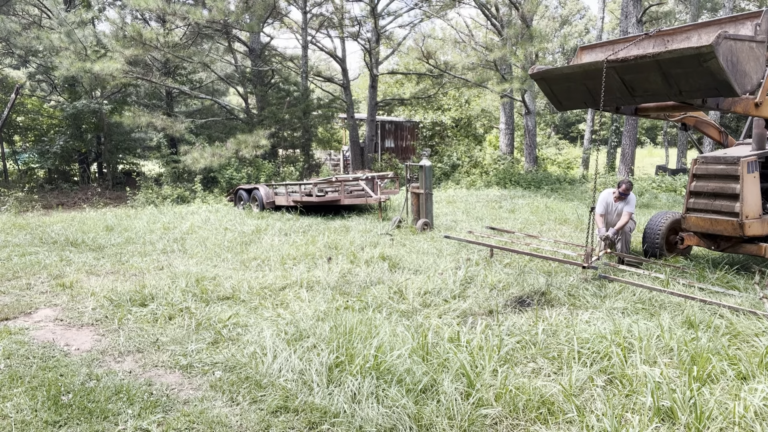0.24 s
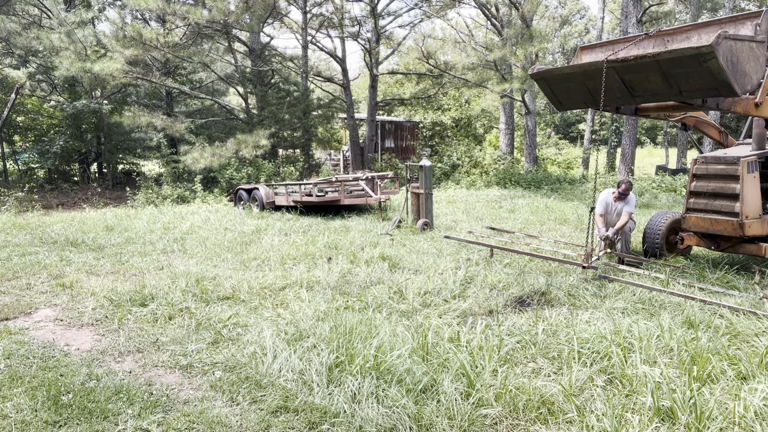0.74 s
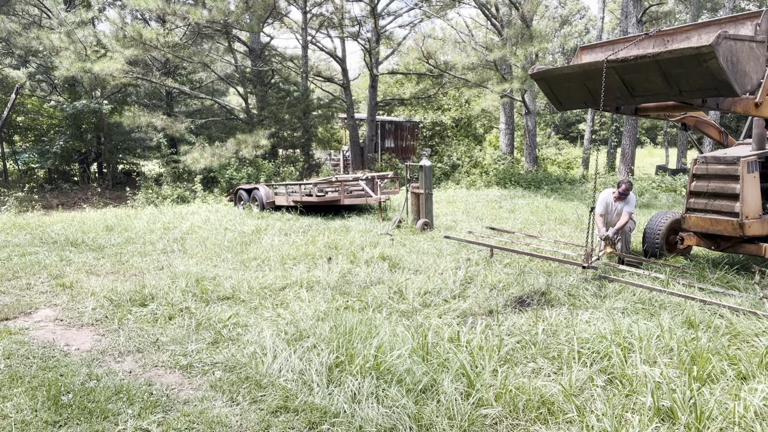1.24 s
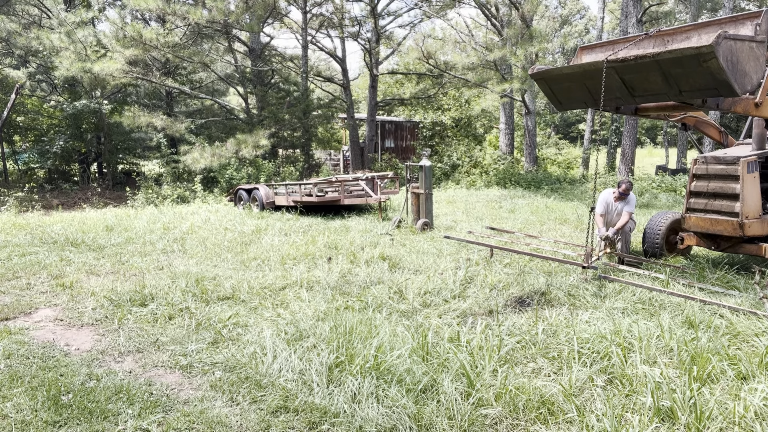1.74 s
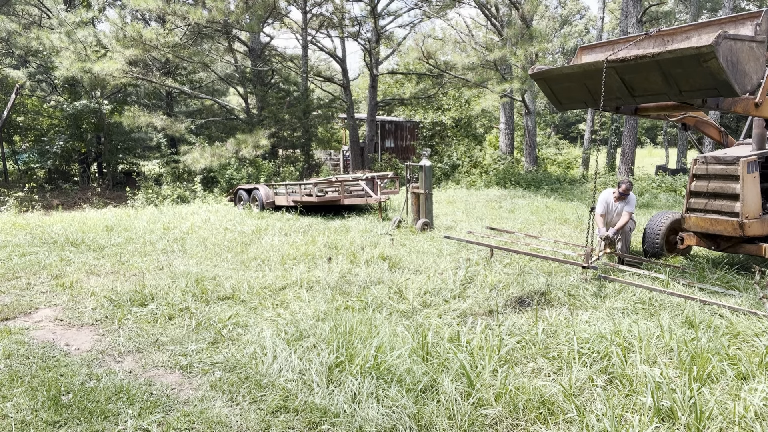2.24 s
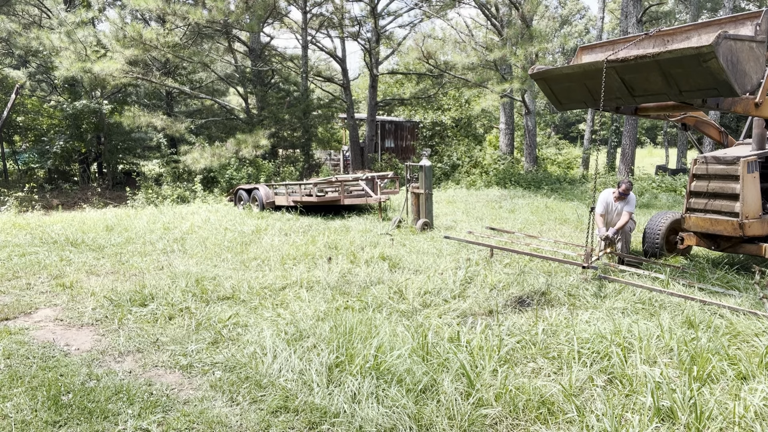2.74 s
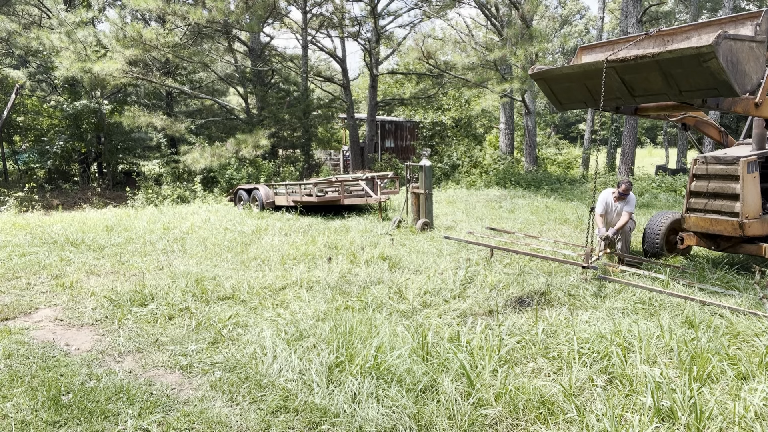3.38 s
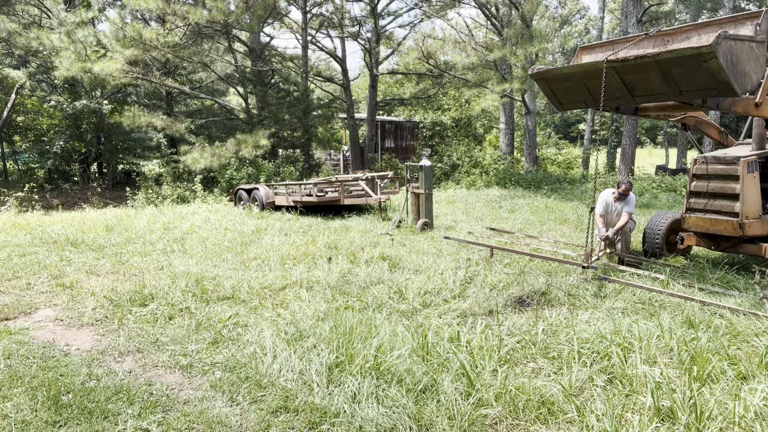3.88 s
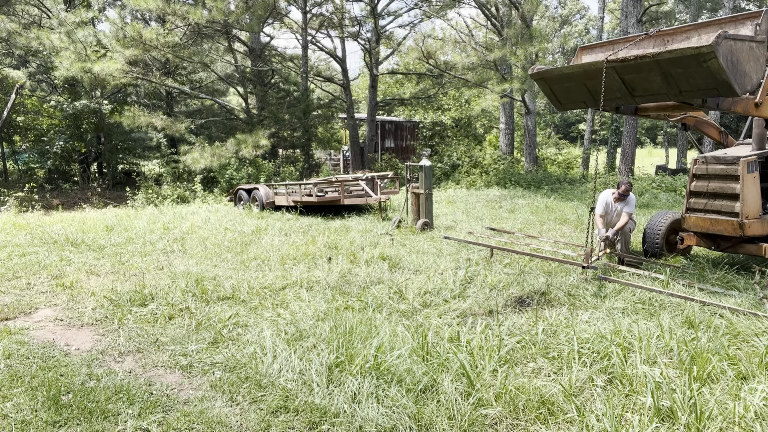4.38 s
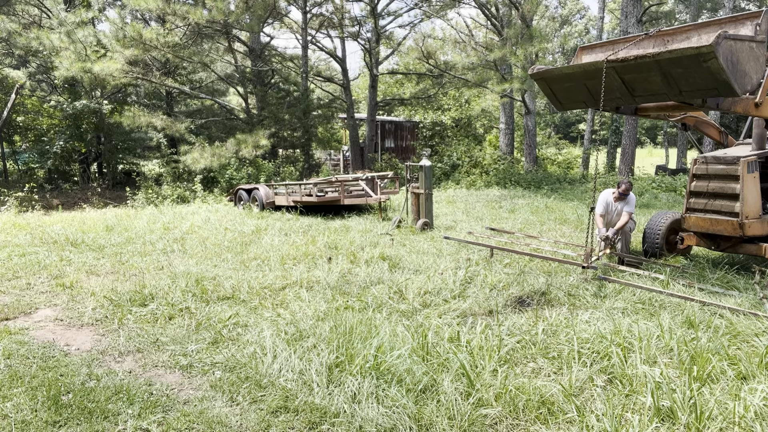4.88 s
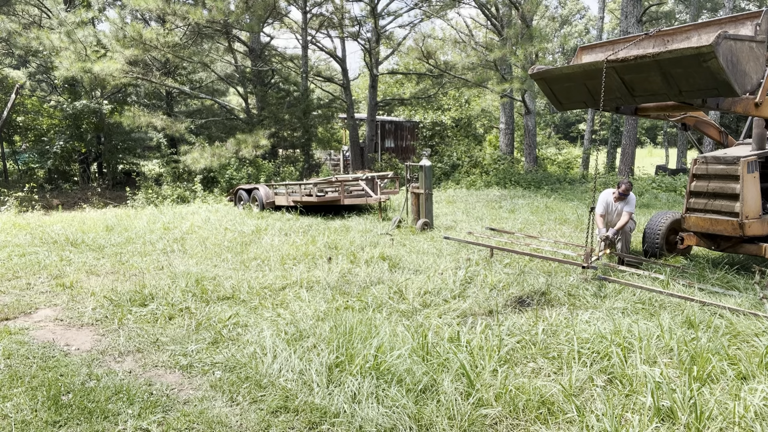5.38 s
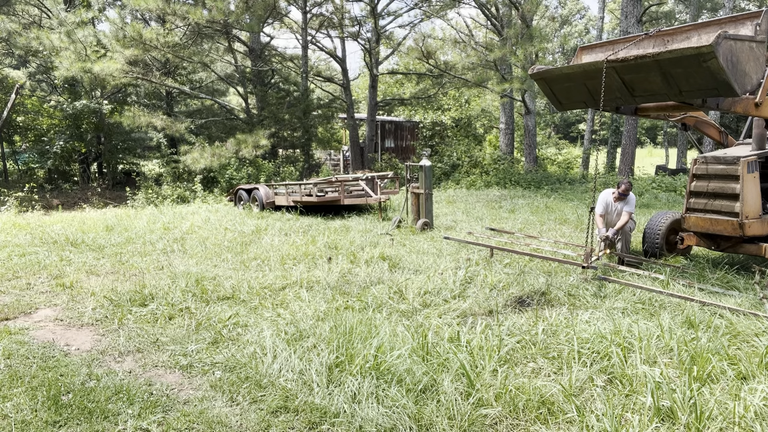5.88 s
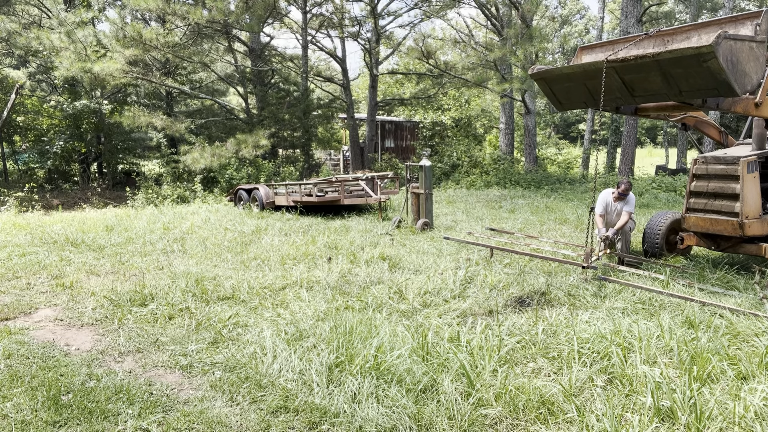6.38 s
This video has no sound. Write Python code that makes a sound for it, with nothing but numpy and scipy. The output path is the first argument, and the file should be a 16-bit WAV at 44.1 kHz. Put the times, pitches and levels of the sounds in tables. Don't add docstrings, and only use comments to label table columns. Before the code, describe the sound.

From 0 s, an outdoor yard rumbles softly and a far engine idles with a low, wavering hum around 100 Hz, a fainter octave coming and going above it. A gas torch jet hisses quietly, lifting slightly near 0.5 s. At about 1 s the cut catches with a brief soft puff, and by 1.4 s it has swelled into a broad, bright, rushing roar. From 1.5 to 2.6 s it flutters with quick surges and dips, eases near 2.9 s, then strengthens around 3.3 s. It swells again at 3.9 s, turns duller near 4.45 s and pushes up at 4.75 s. The roar holds fairly steady until it almost chokes at 5.9 s, returning weaker and continuing to the end at about 6.6 s. Nearby metal gives it fine, shifting resonances. Distant stereo microphones, open air, little echo.

```python
import sys
import numpy as np
from scipy import signal
from scipy.fft import rfft, irfft
from scipy.io import wavfile
from scipy.ndimage import uniform_filter1d

SR = 44100
rng = np.random.default_rng(int(sys.argv[2]) if len(sys.argv) > 2 else 0)


def convert_level_to_amplitude(level_db):
    exponent = np.asarray(level_db, float) / 20
    return 10 ** exponent


def file_out(sig):
    cols = np.atleast_2d(sig).T
    lim = np.clip(cols, -1, 1)
    pcm = np.round(lim * 32767).astype(np.int16)
    wavfile.write(sys.argv[1], SR, pcm)


N = 291942


def evened(x):
    return x / np.sqrt(np.mean(x ** 2) + 1e-20)


def read_spectrum(points, hz):
    f, value = np.transpose(points)
    return np.interp(np.log(hz + 1), np.log(f + 1), value)


def blotches(shape, bins, frames):
    field = rng.standard_normal(shape)
    for _ in range(2):
        field = uniform_filter1d(field, bins, 0)
        field = uniform_filter1d(field, frames, 1)
    return evened(field)


def slow_noise(smooth):
    once = uniform_filter1d(rng.standard_normal(N), smooth)
    return evened(uniform_filter1d(once, smooth))


def frame_grid(size):
    hop = size // 4
    return np.fft.rfftfreq(size, 1 / SR), np.arange(N // hop + 5) * hop / SR


def shaped_noise(level_db, size):
    shape = level_db.shape
    z = convert_level_to_amplitude(level_db) * (rng.standard_normal(shape) + 1j * rng.standard_normal(shape))
    return signal.istft(z, nperseg=size, noverlap=size * 3 // 4)[1][:N]


def noise_pair(level_db, size):
    return np.array([shaped_noise(level_db, size), shaped_noise(level_db, size)])


def rumble():
    # freq_hz [Hz], level_db [dB per Hz]
    yard_spectrum = [(21, -44), (35, -5.5), (112, -7), (210, -13.5), (376, -16), (632, -22.5), (825, -28),
                     (997, -26), (1500, -19.5), (1950, -15), (3300, -120)]
    hz, t = frame_grid(size=4096)
    swell_db = 0.94 * blotches((len(hz), len(t)), bins=8, frames=12)
    level_db = read_spectrum(yard_spectrum, hz)[:, None] + swell_db
    return convert_level_to_amplitude(-47) * evened(noise_pair(level_db, size=4096))


def resonate(x, hz, width_hz):
    turn = np.exp(2j * np.pi * np.cumsum(hz) / SR)
    r = np.exp(-np.pi * width_hz / SR)
    return 2 * (turn * signal.lfilter([1 - r], [1, -r], x / turn)).real


def octave_gain(t):
    # start_s [s], length_s [s], level_db [dB]
    octave_spells = [
        (0.066, .62, -51),
        (0.77, 0.14, -51),
        (0.998, 0.78, -50.5),
        (1.81, 0.78, -53.5),
        (3.427, 0.42, -51.5),
        (3.954, 0.76, -56),
        (4.894, 0.46, -52.5),
        (5.4, 1.2, -61.5),
    ]
    edge_s, rest_db = 0.099, -71.5
    gain = convert_level_to_amplitude(rest_db)
    for start, length, db in octave_spells:
        inside_s = np.minimum(t - start, start + length - t)
        gain = gain + convert_level_to_amplitude(db) * np.clip(inside_s / edge_s + .5, 0, 1)
    return gain


def engine():
    # time_s [s], pitch_hz [Hz] of firing, level_db [dB] of firing tone
    idle = [(0.0, 101, -45), (0.4, 102, -48), (0.7, 103, -47), (0.79, 103, -37), (1.1, 103.2, -45),
            (1.78, 104.2, -44), (1.9, 104.6, -52.5), (2.65, 104.2, -42.5), (3.1, 104.1, -42),
            (3.42, 103, -51.5), (3.7, 103, -44), (4.02, 103.6, -61), (4.2, 104.4, -46),
            (5.14, 104.2, -44.5), (5.5, 104, -47.5), (5.78, 105.8, -41), (6.42, 105.8, -43),
            (6.62, 105.5, -48)]
    # multiple [of firing pitch], width_hz [Hz], level_db [dB], fade_share [of the common fade]
    shaft_orders = [(.51, 3.9, -60, 0), (1.282, 1.5, -50, .7), (1.531, 0.74, -47.5, 4.5),
                    (2.3, 1.7, -66, 1), (2.929, 9, -63, 0), (4.05, 9, -67, 0)]
    fade_db_per_s = -3
    t = np.arange(N) / SR
    time_s, pitch_hz, level_db = np.transpose(idle)
    hz, tone_db = np.interp(t, time_s, pitch_hz), np.interp(t, time_s, level_db)
    turns = 2 * np.pi * np.cumsum(uniform_filter1d(hz, 6000)) / SR
    firing = convert_level_to_amplitude(tone_db + 1.75 * slow_noise(2500)) * np.sin(turns)
    octave = convert_level_to_amplitude(1.2 * slow_noise(2500)) * octave_gain(t) * np.sin(2 * turns + 1)
    hum = np.sqrt(2) * (firing + octave)
    for multiple, width, db, fade_share in shaft_orders:
        narrow = resonate(rng.standard_normal(N), multiple * hz, width)
        order = evened(resonate(narrow, multiple * hz, 2 * width))
        hum = hum + convert_level_to_amplitude(db + fade_db_per_s * fade_share * t) * order
    return np.array([hum, 0 * hum])


def surges_db(t):
    # time_s [s], change_db [dB], length_s [s]
    slag_surges = [(0.74, 3, 0.027), (0.955, 0, 0.04), (1.294, -3.5, 0.077), (1.548, 2, 0.04),
                   (1.707, 4, 0.049), (1.776, -2.5, 0.049), (2.045, 3.5, 0.028), (2.256, 4, 0.03),
                   (2.292, -4, 0.037), (2.36, -3.5, 0.057), (2.437, 5.5, 0.036), (2.62, 2, 0.026),
                   (2.963, 2.3, 0.017), (3.074, 0.3, 0.045), (3.36, -1.5, 0.091), (3.48, -3, 0.08),
                   (3.598, 2, 0.06), (3.907, 4.9, 0.12), (4.103, -2, 0.031), (4.25, -1.5, 0.089),
                   (4.762, 4, 0.12), (4.845, -3, 0.032), (5.425, -1.3, 0.14), (6.344, 1, 0.19)]
    catch_s, catch_db, catch_decay_s = 1.0, 2, 0.035
    total_db = catch_db * (t >= catch_s) * np.exp(-abs(t - catch_s) / catch_decay_s)
    for at, db, length in slag_surges:
        total_db = total_db + db * np.exp(-4 * np.log(2) * ((t - at) / length) ** 2)
    return total_db


def jet_field():
    # time_s [s], roar_db [dB] for depth of cut, aim_db [dB] for nozzle toward camera
    torch_moves = [(0.0, -47.5, -1), (0.55, -43.9, 1.8), (0.88, -47.5, 3), (1.02, -43, 0.8),
                   (1.36, -31, 1.5), (1.75, -34, -0.1), (2.3, -34.5, -0.8), (2.85, -37.5, -1.5),
                   (3.3, -33, 1.5), (3.8, -36.5, -1.3), (4.15, -35.5, -0.5), (4.45, -37.5, -5.5),
                   (4.68, -36, -0.9), (5.4, -36, 1.2), (5.86, -39, 1.2), (5.94, -45.5, -3),
                   (6.1, -41, -1.5), (6.62, -39, -2)]
    # freq_hz [Hz], layer [index: boom, body, roar, hiss, fizz]
    jet_bands = [(800, 0), (1500, 1), (1900, 1), (3200, 2), (5600, 2), (6800, 3), (11100, 3), (11800, 4)]
    follow_cut = [0.54, 0.74, 0.99, 0.79, .57]
    follow_aim = [-0.39, -0.51, 0.073, 0.93, 1.3]
    follow_surge = [.4, .8, 1, 1.05, 1.1]
    mean_roar_db = -37.3
    hz, t = frame_grid(size=1024)
    time_s, roar_db, aim_db = np.transpose(torch_moves)
    layers_db = mean_roar_db + np.outer(follow_cut, np.interp(t, time_s, roar_db) - mean_roar_db)
    layers_db = layers_db + np.outer(follow_aim, np.interp(t, time_s, aim_db))
    layers_db = layers_db + np.outer(follow_surge, surges_db(t))
    band_hz, layer = np.transpose(jet_bands)
    share = np.array([np.interp(hz, band_hz, layer == k) for k in range(len(layers_db))]).T
    shape = (len(hz), len(t))
    drifting_db = .75 * blotches(shape, bins=8, frames=40)
    patchy_db = 0.87 * blotches(shape, bins=30, frames=6)
    flicker_db = 0.71 * blotches(shape, bins=300, frames=3)
    return share @ layers_db + drifting_db + patchy_db + flicker_db


def many_paths(x, comb_db):
    hz, t, z = signal.stft(x, SR, nperseg=4096)
    streaks_db = comb_db * blotches(z.shape[1:], bins=3, frames=12)
    mean_rise_db = comb_db ** 2 * np.log(10) / 20
    return signal.istft(z * convert_level_to_amplitude(streaks_db - mean_rise_db), SR, nperseg=4096)[1][:, :N]


def rings_db(hz):
    # freq_hz [Hz], width_hz [Hz], level_db [dB]
    resonances = [(1002, 46, 5.6), (1134, 44, 6.5), (1256, 99, 2.3), (1358, 53, 7.0), (1491, 39, 4.1),
                  (1699, 247, 5.7), (1836, 46, 6.5), (2078, 66, 4.3), (2289, 30, 0.2), (2571, 30, 2.7),
                  (2678, 30, 3.5), (2842, 98, 4.1), (3165, 50, 2.9), (3410, 89, 3.5), (3809, 141, 4.3),
                  (4029, 120, 7.3), (4270, 199, 4.2), (4664, 299, 4.8), (4996, 119, 3.7), (5223, 461, 6.1),
                  (5887, 75, 2.3), (6660, 157, 4.0), (7094, 262, 5.0), (8246, 299, 3.2), (8867, 564, 4.0),
                  (10213, 92, 2.0), (10477, 79, 3.2), (10980, 257, 2.1), (12647, 947, 2.5),
                  (14696, 718, 2.0)]
    return sum(db * np.exp(-.5 * (2 * (hz - f) / w) ** 2) for f, w, db in resonances)


def jet():
    # freq_hz [Hz], level_db [dB]
    jet_colour = [(250, -15.8), (600, -5.5), (900, -8.3), (1500, -4.6), (2500, -1.7), (3500, -1.5),
                  (5000, -3.9), (6100, -1.4), (7600, -0.1), (9000, 0.0), (11200, -0.8), (12000, -5.4),
                  (13600, -2.5), (15600, -2.2)]
    level_db = jet_field() - 17
    sputter = convert_level_to_amplitude(0.4 * slow_noise(90))
    hiss = many_paths(sputter * noise_pair(level_db, size=1024), comb_db=3.0)
    hz = np.fft.rfftfreq(N, 1 / SR)
    return irfft(rfft(hiss) * convert_level_to_amplitude(read_spectrum(jet_colour, hz) + rings_db(hz)), N)


def ports(field):
    # freq_hz [Hz], lead_rad [rad] of the right, likeness [0-1], balance_db [dB] left minus right
    port_pair = [(40, .09, .99, -.2), (200, .68, .93, -.8), (500, 1.07, .88, -3.5), (900, 1.25, .7, -8.5),
                 (1150, 1.15, .87, -7.5), (1800, 2.3, .9, -.3), (3250, 4.5, .8, -.5), (4400, 5.75, .48, -3),
                 (5350, 7.5, .6, -5.5), (6050, 8.7, .2, -2.5), (7100, 10.6, .86, 5), (9500, 10.1, .9, .3),
                 (12500, 8.85, .91, 0), (15600, 7.5, .86, 0)]
    hz = np.fft.rfftfreq(N, 1 / SR)
    freq_hz, *columns = np.transpose(port_pair)
    lead, same, balance_db = (np.interp(hz, freq_hz, c) for c in columns)
    unlike = (1 - same) * 1.3 * convert_level_to_amplitude(-1.5 * rings_db(hz))
    same = np.clip(1 - unlike, 0, 1)
    direct, scattered = rfft(field)
    left = direct * convert_level_to_amplitude(balance_db / 2)
    mixed = same * direct + np.sqrt(1 - same ** 2) * scattered
    right = mixed * np.exp(1j * lead) * convert_level_to_amplitude(-balance_db / 2)
    return irfft(np.array([left, right]), N)


def opposed(pair):
    # time_s [s], top_hz [Hz]
    low_null_top = [(0, 2760), (1.1, 2780), (1.3, 3020), (2.3, 2950), (2.8, 2820), (3.9, 2870), (4.3, 2680),
                    (4.75, 2960), (5.8, 3040), (6.05, 2760), (6.4, 2920)]
    high_null_edges = [9860, 12350]
    edge_wander = [60, 150, 140, 230]
    low_null_bottom_hz, softness_hz, depth_db = 2090, 110, -15
    hz, t, z = signal.stft(pair.mean(0), SR, nperseg=1024, noverlap=768)
    resting = [low_null_bottom_hz, np.interp(t, *np.transpose(low_null_top)), *high_null_edges]
    inside = 0
    for k, (rest_hz, wander_hz) in enumerate(zip(resting, edge_wander)):
        edge_hz = rest_hz + wander_hz * blotches((1, len(t)), bins=1, frames=5)[0]
        inside = inside + (-1) ** k * np.tanh((hz[:, None] - edge_hz) / softness_hz) / 2
    lost = signal.istft(z * (1 - convert_level_to_amplitude(depth_db * inside)), SR, nperseg=1024, noverlap=768)[1][:N]
    return pair - lost


def scene():
    return opposed(ports(rumble() + engine() + jet()))


def band_limit(x):
    return signal.sosfilt(signal.butter(12, 16970, fs=SR, output="sos"), x)


def record(dry):
    bass_cut = signal.butter(6, 40, "highpass", fs=SR, output="sos")
    top_limit = signal.firwin(2047, 15745, window=("kaiser", 16), fs=SR)
    mix = signal.oaconvolve(signal.sosfilt(bass_cut, dry), top_limit[None], "same")
    return band_limit(mix)


dry = scene()
out = record(dry)
file_out(out)
```